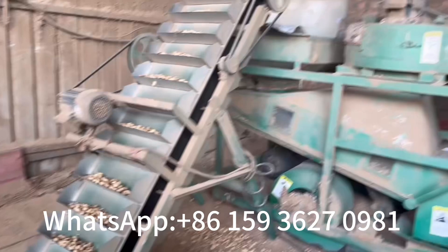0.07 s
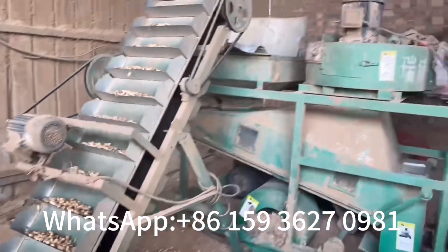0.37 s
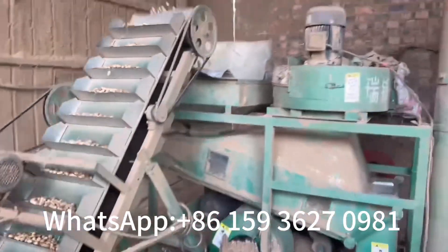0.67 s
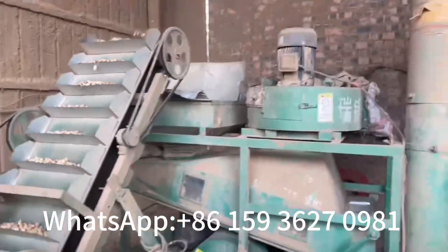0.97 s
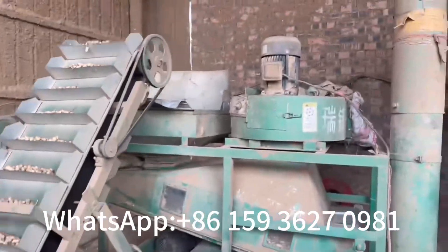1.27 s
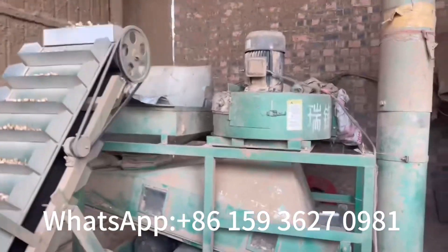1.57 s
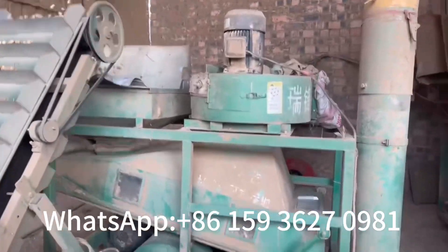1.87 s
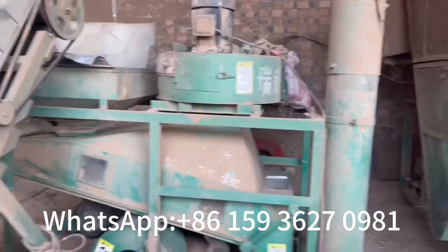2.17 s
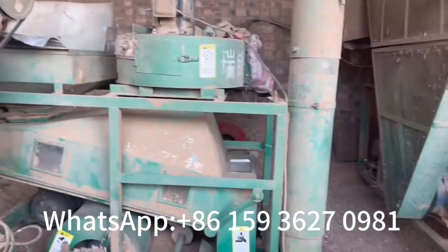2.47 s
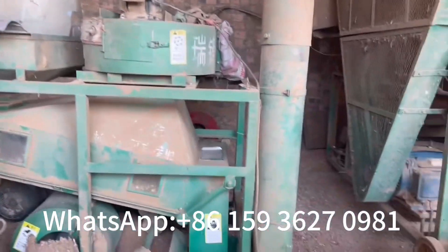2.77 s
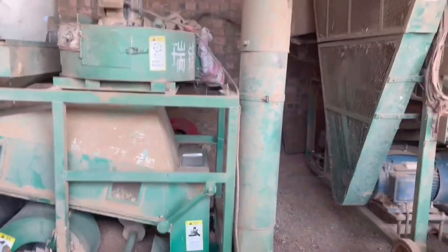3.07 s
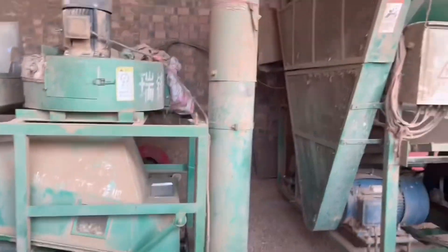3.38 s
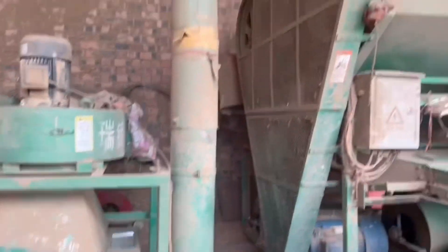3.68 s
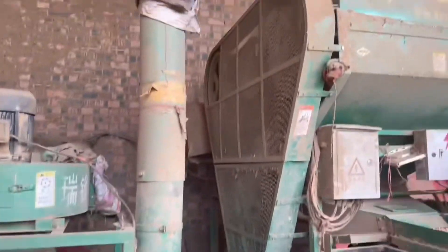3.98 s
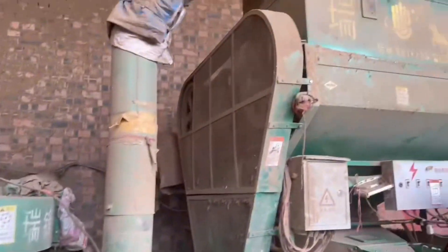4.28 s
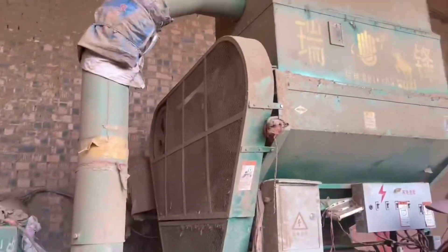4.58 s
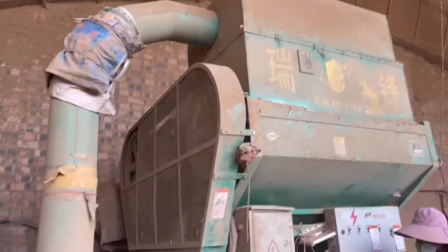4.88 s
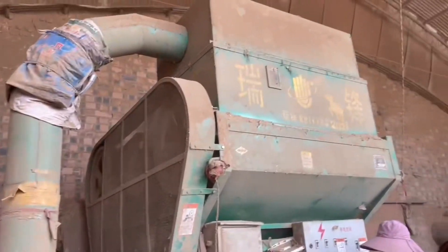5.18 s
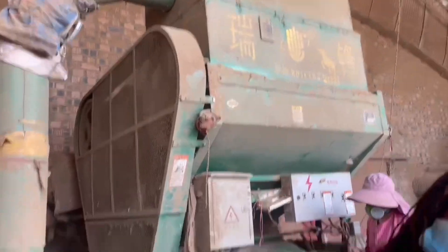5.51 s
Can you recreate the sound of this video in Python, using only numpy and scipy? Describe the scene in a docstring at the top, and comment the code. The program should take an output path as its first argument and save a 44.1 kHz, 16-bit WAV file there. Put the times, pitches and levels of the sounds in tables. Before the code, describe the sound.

A peanut shelling machine runs steadily in a large shed, heard from a few steps away. Air roars in the ducts over the hum of fans and a drum, and the steel housing rumbles with uneven low thumps. Dry pods rattle and crack against a ringing grate while kernels swish in quick pulses on a sieve. One fan's hum gradually fades, and a hollow roar and hiss swell slightly around four seconds in.

```python
"""In a large shed a peanut sheller runs, heard from a few steps away as the listener turns along it.
Fans and the shelling drum hum at harmonics of their rotation. The tumbling load excites the modes of
the steel housing, which rumbles, and turbulent air roars in the ducts. Pods rattle and burst in the
drum and make its grate ring, and kernels swish on a shaking sieve. Low thumps stand out of the rumble,
faint high ticks dot the rattle, and a hollow roar with a hiss swells around 4 s."""
import sys
import numpy as np
from scipy import signal
from scipy.fft import rfft, irfft, next_fast_len
from scipy.io import wavfile
from scipy.ndimage import uniform_filter1d

SR = 44100
rng = np.random.default_rng(int(sys.argv[2]) if len(sys.argv) > 2 else 0)


def unload_wav(signal):
    """Save mono or channel-first audio to the path in sys.argv[1] as 16-bit WAV at rate SR, clipped to [-1, 1]."""
    wavfile.write(
        sys.argv[1],
        SR,
        np.round(np.clip(np.atleast_2d(signal).T, -1, 1) * 32767).astype(np.int16),
    )


N = 249165


# partials of each rotor: harmonic_number, relative_db
BLOWER_HARMONICS = [(1, 0), (2, -20)]
SUCTION_HARMONICS = [(1, -30), (4, -15), (5, -32), (6, -1)]
DRUM_HARMONICS = [(1, -5), (4, 0)]
# the blower fades as the listener turns away: time_s, level_db
BLOWER_LEVELS = [(0.15, -18.4), (1.0, -20.9), (1.9, -21.3), (2.4, -22.5), (3.0, -21.0), (3.4, -22.5),
                 (3.7, -25.8), (4.15, -24.4), (4.6, -27.5), (5.05, -29.3), (5.6, -29.2)]
# the drum's tone stands out while the listener faces it: time_s, level_db
DRUM_LEVELS = [(0.1, -33.5), (0.7, -29.5), (1.0, -30.8), (1.3, -28.2), (2.5, -27.4), (3.22, -27.3),
               (3.45, -30.4), (4.0, -29.2), (4.55, -29.9), (4.68, -31.4), (4.9, -29.6), (5.5, -28.9)]

def rotor_hum(blower_hz, suction_hz, drum_hz):
    """Periodic forcing: two fans and the drum, turning steadily, each radiate harmonic tones."""
    blower = rotor(blower_hz, BLOWER_HARMONICS, flutter_db=0.45, wander_hz=0.12)
    suction = rotor(suction_hz, SUCTION_HARMONICS, flutter_db=1.5, wander_hz=0.016)
    drum = rotor(drum_hz, DRUM_HARMONICS, flutter_db=0.4, wander_hz=0.07)
    drum_octave = rotor(drum_hz, [(2, 0)], flutter_db=2.5, wander_hz=0.082)
    blower *= from_db(over_time(BLOWER_LEVELS))
    suction *= passing(nearest_s=2.5, top_db=-25, rise_db_per_s=2.5, fall_db_per_s=0.7)
    drum *= from_db(over_time(DRUM_LEVELS))
    drum_octave *= passing(nearest_s=5, top_db=-30.5, rise_db_per_s=0.5, fall_db_per_s=1.2)
    return blower + suction + drum + drum_octave


def rotor(fundamental_hz, harmonics, flutter_db, wander_hz):
    """Modulation: load sways the shaft's speed, and turbulence shakes each harmonic's amplitude."""
    phase = 2 * np.pi * np.cumsum(fundamental_hz + wander_hz * drift(0.93)) / SR
    tone = 0
    for number, db in harmonics:
        amplitude = from_db(db + flutter_db * drift(7.0))
        tone += amplitude * np.sin(number * phase + rng.uniform(0, 2 * np.pi))
    return np.sqrt(2) * tone


# spectrum of the duct air: frequency_hz, density_db
AIR_SPECTRUM = [(22, -28), (32, -21), (45, 2), (60, 2), (200, 5), (350, 5), (560, 0.5), (720, -2),
                (950, -2.5), (1500, -9.5), (3000, -13), (7000, -31.5), (13000, -61)]

def duct_roar(level_db, gust_db, churn_db):
    """Turbulence: air from the fans makes broadband noise whose level wavers quickly."""
    air = shaped(rng.standard_normal((2, N)), from_db(over_hz(AIR_SPECTRUM)))
    return from_db(level_db + gust_db * drift(14) + churn_db * drift(24)) * diffuse(air)


# modes of the sheet steel housing: pitch_hz, bandwidth_hz, relative_db
PANEL_MODES = [(52.8, 7.1, -10), (76, 31, 1), (118, 31, 0), (164.5, 36, -2.5), (198, 50, -5),
               (274.7, 12, -6), (304.7, 24, -6.5)]

def housing_rumble(level_db, surge_db, surge_hz):
    """Forced vibration: the tumbling load drums on the steel panels in uneven surges."""
    panels = struck_modes(PANEL_MODES, per_s=600, spread_db=2.0)
    local_power = uniform_filter1d(np.mean(panels ** 2, axis=0), size=3000)
    steady = panels / np.sqrt(local_power + 1e-12)
    return from_db(level_db - surge_db * drift(surge_hz)) * steady


# louder low thumps in the rumble: start_s, peak_db, pitch_hz
LOW_THUMPS = [(0.082, -13, 150), (0.165, -22, 72), (0.217, -16, 125), (0.334, -11.5, 75), (0.39, -12, 125),
              (0.461, -19, 75), (0.545, -16, 190), (0.645, -16, 75), (0.911, -14, 140), (0.977, -16, 72),
              (1.085, -14, 165), (1.234, -16, 170), (1.279, -12, 98), (1.492, -9.5, 170), (1.746, -14, 68),
              (1.818, -12, 140), (1.885, -17, 75), (2.236, -15, 170), (2.301, -20, 140),
              (2.769, -14.5, 150), (2.91, -13.5, 145), (3.123, -16, 125), (3.368, -14, 75),
              (3.675, -14, 100), (3.864, -22, 75), (4.407, -16, 190), (4.608, -16, 77.5), (4.74, -21, 70),
              (4.85, -13, 205), (4.945, -21, 82), (5.356, -16, 70), (5.54, -14, 150)]

def low_thumps(ring_s, rolloff_db_per_octave):
    """Modal decay: each thump in the rumble is a brief sum of panel modes, weighted toward its pitch."""
    out = np.zeros(N + SR)
    t = np.arange(SR // 4) / SR
    hz, bandwidth_hz, mode_db = np.transpose(PANEL_MODES)[:, :, None]
    envelopes = t * np.exp(-t * (np.pi * bandwidth_hz / 2 + 1 / ring_s))
    for start_s, peak_db, pitch_hz in LOW_THUMPS:
        phases = rng.uniform(0, 2 * np.pi, hz.shape)
        octaves_away = np.abs(np.log2(hz / pitch_hz))
        weights = bandwidth_hz * from_db(mode_db - rolloff_db_per_octave * octaves_away)
        thump = np.sum(weights * envelopes * np.sin(2 * np.pi * hz * t + phases), axis=0)
        start = int(start_s * SR)
        out[start:start + len(t)] += from_db(peak_db) * thump / np.abs(thump).max()
    return out[:N]


# spectrum of cracking pods: frequency_hz, density_db
POD_SPECTRUM = [(300, 1), (900, 1), (1500, 3.5), (2200, 0), (3100, 0), (3900, -2.5), (5500, -5.5),
                (7000, -13.5), (13000, -58)]
# modes of the drum's grate: pitch_hz, bandwidth_hz, relative_db
GRATE_MODES = [(937, 110, -4), (1176, 95, 2), (1375, 100, -2.5), (1860, 130, 0), (2050, 120, -7),
               (2520, 110, -3.5), (2680, 90, -4), (2890, 130, -5), (3210, 110, -4.5), (3970, 120, -13)]

def pod_rattle(level_db, per_s, clump_db, ring_db):
    """Shot noise and resonance: dry pods crack in clumps, and the grate rings under their knocks."""
    hits = impacts(per_s, spread_db=2.5) * from_db(clump_db * drift(13.6))
    hits = reverberate(hits, t60_s=0.93, wet_db=-3)
    crackle = diffuse(shaped(hits, from_db(over_hz(POD_SPECTRUM))))
    ring = from_db(ring_db) * struck_modes(GRATE_MODES, per_s=160, spread_db=1.5)
    return from_db(level_db) * (crackle + ring)


# single pods that burst loudly: start_s, level_db
POD_BURSTS = [(0.235, -21), (0.827, -22), (1.586, -22), (1.977, -22), (2.152, -19), (2.223, -19.5),
              (3.221, -25), (3.448, -23), (4.09, -22.5), (5.285, -21)]
# spectrum of a bursting shell: frequency_hz, density_db
SHELL_SPECTRUM = [(400, -5), (900, 7), (2000, -4), (4000, -6), (9000, -16), (13000, -32)]

def pod_bursts(decay_s, per_s):
    """Brittle fracture: a pod snaps against the steel in a spray of shell that decays exponentially."""
    t = np.arange(N) / SR
    envelope = sum(from_db(db) * (t >= s) * np.exp(-np.clip((t - s) / decay_s, 0, 30))
                   for s, db in POD_BURSTS)
    spray = diffuse(shaped(impacts(per_s, spread_db=2.0), from_db(over_hz(SHELL_SPECTRUM))))
    return reverberate(envelope * spray, t60_s=0.3, wet_db=-18)


# spectrum of kernels on the mesh: frequency_hz, density_db
KERNEL_SPECTRUM = [(1500, -25), (4000, -7.5), (6000, -2), (7200, 0), (8500, 5), (9900, 8.5), (10500, 4.5),
                   (11000, 1.5), (12000, -10), (13200, -31)]
# the sieve, as its load and the listener's place change: time_s, level_db
SIEVE_LEVELS = [(0.1, -28.5), (1.1, -29), (1.55, -27), (2.1, -28), (2.4, -28.5), (3.45, -27.5), (4.2, -29),
                (4.9, -29.5), (5.6, -29.5)]

def sieve_swish(per_s, clump_db):
    """Shot noise: countless impacts of kernels on the mesh merge into a hiss that swells each stroke."""
    hits = impacts(per_s, spread_db=1.5)
    swell_db = sieve_throws(strokes_per_s=7.07, first_s=0.032, half_width_s=0.018)
    hits *= from_db(swell_db + clump_db * drift(18))
    hits = reverberate(hits, t60_s=0.29, wet_db=-6)
    hiss = diffuse(shaped(hits, from_db(over_hz(KERNEL_SPECTRUM))))
    return from_db(over_time(SIEVE_LEVELS)) * hiss


# heavy throws of kernels: time_s, swell_db
HEAVY_STROKES = [(0.16, 2), (0.33, 2.5), (0.598, 3.5), (0.775, 3.5), (1.028, 2), (1.151, 2.5), (1.3, 3.5),
                 (1.71, 1.5), (2.02, 3), (2.13, 4.5), (2.48, 2), (2.805, 3), (2.978, 4.5), (3.13, 2),
                 (3.44, 1), (3.59, 3), (4.06, 1), (4.33, 3), (4.6, 1), (5.115, 2), (5.34, 2.2), (5.53, 2.8)]

def sieve_throws(strokes_per_s, first_s, half_width_s, light_db=1, scatter_s=0.017, scatter_db=0.5):
    """Amplitude modulation: each turn of the crank throws the kernels, giving a Gaussian swell in dB."""
    t = np.arange(N) / SR
    chance = rng.standard_normal((int(t[-1] * strokes_per_s) + 2, 2))
    times_s = first_s + np.arange(len(chance)) / strokes_per_s + scatter_s * chance[:, 0]
    swells_db = light_db - scatter_db * chance[:, 1]
    for s, db in HEAVY_STROKES:
        stroke = round((s - first_s) * strokes_per_s)
        times_s[stroke], swells_db[stroke] = s, db
    return sum(db * np.exp(-np.minimum(((t - s) / half_width_s) ** 2, 20))
               for s, db in zip(times_s, swells_db))


# faint, brief high ticks in the rattle: start_s, relative_db, pitch_hz
HIGH_TICKS = [(0.1444, -18, 9090), (0.3544, -19, 3500), (1.5264, -12, 3250), (1.8654, -16, 3040),
              (2.1794, -14, 3290), (2.7194, -11, 9430), (2.7694, -15, 3970), (3.1334, -17, 3990),
              (3.3408, -17, 8530), (3.3934, -18, 3980), (3.5744, -16, 3530), (4.0284, -15, 3920)]

def high_ticks(listed_gain_db, small_db, per_s, bunching, decay_cycles):
    """Damped oscillation: each faint tick is three close tones; smaller ticks come in random bunches."""
    rate_per_s = per_s * np.exp(np.clip(bunching * drift(9), -4, 2))
    starts_s = np.flatnonzero(rng.random(N) < rate_per_s / SR) / SR
    softness, height = rng.random((len(starts_s), 2)).T
    small = np.transpose([starts_s, small_db - 10 * softness, 2000 * 4 ** height])
    listed = np.array(HIGH_TICKS) + [0, listed_gain_db, 0]
    t = np.arange(SR // 50) / SR
    out = np.zeros((2, N + len(t)))
    for start_s, db, hz in np.vstack([listed, small]):
        tones_hz = hz * rng.uniform(0.85, 1.15, (3, 1))
        rings = np.sin(2 * np.pi * tones_hz * t) * np.exp(-t * hz / decay_cycles)
        shares_per_ear = rng.dirichlet(np.ones(3), 2)
        start = int(start_s * SR)
        out[:, start:start + len(t)] += from_db(db) * shares_per_ear @ rings
    return out[:, :N]


# bands of a hollow roar and a hiss: centre_hz, bandwidth_hz, relative_db
ROAR_AND_HISS_BANDS = [(740, 220, 0), (4570, 1700, -6)]

def roar_and_hiss():
    """Band-limited noise: a hollow roar near 740 Hz and a hiss near 4.6 kHz swell around 4 s."""
    gain = passing(4, top_db=-33.5, rise_db_per_s=6, fall_db_per_s=1.5)
    return gain * struck_modes(ROAR_AND_HISS_BANDS, per_s=1500, spread_db=2.5)


def struck_modes(modes, per_s, spread_db):
    """Modal superposition: each resonant band is kept ringing by its own rain of impulses."""
    out = 0
    for hz, width_hz, db in modes:
        band = signal.butter(2, [hz - width_hz / 2, hz + width_hz / 2], "band", fs=SR, output="sos")
        ringing = signal.sosfilt(band, impacts(per_s, spread_db) + 1e-18)
        out += from_db(db) * unit_rms(ringing)
    return diffuse(out)


def impacts(per_s, spread_db):
    """Poisson process: two streams of random clicks, many small and a few large."""
    sizes = from_db(spread_db * np.minimum(rng.exponential(1, (2, N)), 4))
    signs = rng.choice([-1, 1], (2, N))
    return unit_rms(sizes * signs * (rng.random((2, N)) < per_s / SR))


def near_walls(x, echo_db, sway_s, count):
    """Comb filtering: echoes off nearby steel shift in delay as the listener moves, changing colour."""
    n = np.arange(N)
    out = x.copy()
    for lag_s in rng.uniform(0.002, 0.009, count):
        delayed = n - SR * (lag_s + sway_s * drift(0.4))
        out += from_db(echo_db) * np.array([np.interp(delayed, n, side) for side in x])
    return out / np.sqrt(1 + count * from_db(echo_db) ** 2)


def reverberate(x, t60_s, wet_db):
    """Reverberation: the shed stores sound energy and releases it as a decaying noisy tail."""
    retained = from_db(-120 / (t60_s * SR))
    energy = signal.lfilter([1 - retained], [1, -retained], x ** 2)
    return x + from_db(wet_db) * np.sqrt(energy) * rng.standard_normal((2, N))


# likeness of the sound at the two ears: frequency_hz, coherence
EAR_COHERENCE = [(50, 1), (150, 0.98), (350, 0.71), (600, 0.57), (1400, 0.56), (3000, .72), (5200, 0.66),
                 (6400, 0.98), (7200, 0.62), (8500, 1), (12000, 1)]

def diffuse(pair):
    """Partial coherence: two unrelated signals mix, most alike at the ears in the bass and high treble."""
    coherence = np.clip(over_hz(EAR_COHERENCE), 0, 0.999)
    mid = shaped(pair[0], np.sqrt(1 + coherence))
    side = shaped(pair[1], np.sqrt(1 - coherence))
    return unit_rms(np.array([mid + side, mid - side]))


def passing(nearest_s, top_db, rise_db_per_s, fall_db_per_s):
    """Exponential rise and fall of gain, as when a listener nears a source and leaves it."""
    since_s = np.arange(N) / SR - nearest_s
    return from_db(top_db + np.minimum(rise_db_per_s * since_s, -fall_db_per_s * since_s))


def drift(corner_hz):
    """Random fluctuation: low-passed noise of unit RMS."""
    hop, settling = 40, 2000
    pole = np.exp(-2 * np.pi * corner_hz * hop / SR)
    noise = rng.standard_normal(N // hop + settling + 2)
    slow = signal.lfilter([1], [1, -2 * pole, pole * pole], noise)[settling:]
    return np.interp(np.arange(N) / hop, np.arange(len(slow)), unit_rms(slow))


def from_db(db):
    return 10 ** (np.asarray(db) / 20)


def unit_rms(x):
    return x / np.sqrt(np.mean(x ** 2) + 1e-20)


def over_time(points):
    """Linear interpolation of a time curve at every sample."""
    return np.interp(np.arange(N) / SR, *np.transpose(points))


def over_hz(points):
    """Interpolation over log frequency at every bin of the padded spectrum."""
    hz, value = np.transpose(points)
    bins = np.fft.rfftfreq(next_fast_len(N), 1 / SR)
    return np.interp(np.log(np.maximum(bins, 1)), np.log(hz), value)


def shaped(x, gain):
    """Linear filtering by a gain per frequency bin."""
    return irfft(rfft(x, next_fast_len(N)) * gain, next_fast_len(N))[..., :N]


# the shelling, as the load and the listener's place change: time_s, relative_db
SHELLING_LEVELS = [(0.1, -23), (0.9, -23.5), (1.6, -22.5), (2.4, -22.5), (3.1, -22.5), (3.8, -23.5),
                   (4.6, -24.5), (5.5, -24.5)]
# level difference between the ears: frequency_hz, left_minus_right_db
EAR_BALANCE = [(40, 0), (120, 2), (320, 1), (620, 4.5), (1200, 2.0), (3000, 2.5), (5200, 2.5), (6500, 1),
               (9000, 0.5)]

def scene():
    """Superposition: all parts sound at once, with the bulk of the machine a little to the left."""
    shelling_db = over_time(SHELLING_LEVELS)
    swing_db = shelling_db - shelling_db.mean()
    rumble = housing_rumble(level_db=-23.5 + 0.55 * swing_db, surge_db=0.9, surge_hz=6.6)
    thumps = low_thumps(ring_s=0.03, rolloff_db_per_octave=10)
    air = duct_roar(level_db=-20.5 + swing_db, gust_db=0.5, churn_db=0.09)
    swell = roar_and_hiss()
    rattle = pod_rattle(level_db=-28 + 1.3 * swing_db, per_s=8000, clump_db=2.0, ring_db=-8)
    swish = sieve_swish(per_s=12000, clump_db=0.94)
    ticks = high_ticks(listed_gain_db=-1.5, small_db=-25, per_s=90, bunching=0.8, decay_cycles=9.7)
    bursts = pod_bursts(decay_s=0.0071, per_s=4100)
    clatter = near_walls(rattle + swish + ticks + bursts, echo_db=-14, sway_s=0.000309, count=5)
    hum = rotor_hum(blower_hz=327.3, suction_hz=49.15, drum_hz=117.92)
    balance = from_db(over_hz(EAR_BALANCE) * [[0.5], [-0.5]])
    return shaped(hum + rumble + thumps + air + swell + clatter, balance)


# phase between the two microphone ports: frequency_hz, left_lead_rad
PORT_LEAD = [(600, .1), (1650, -.65), (2900, .8), (3900, .35), (5300, .5), (6700, 0), (7750, .7), (8300, 0),
             (8850, -.1), (9700, -2.6), (10250, -3.14), (10950, -3.7), (11300, -5.6), (11700, -6.1)]

def record(dry, low_cut_hz=36, high_cut_hz=13100, start_s=0.036):
    """Phase shift and band limiting: the microphone ports differ most around their resonance."""
    left = shaped(dry[0], np.exp(1j * over_hz(PORT_LEAD)))
    high_pass = signal.butter(6, low_cut_hz, "high", fs=SR, output="sos")
    low_pass = signal.ellip(10, 0.1, 80, high_cut_hz, fs=SR, output="sos")
    ports = signal.sosfilt(high_pass, np.array([left, dry[1]]))
    opened = np.arange(N) / SR > start_s  # the sound opens abruptly
    return signal.sosfilt(low_pass, ports * opened)


dry = scene()
out = record(dry)
unload_wav(out)
```